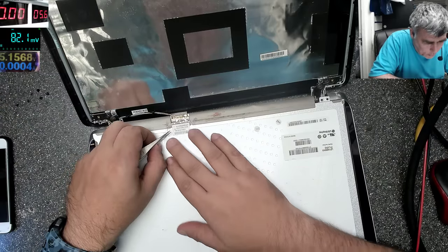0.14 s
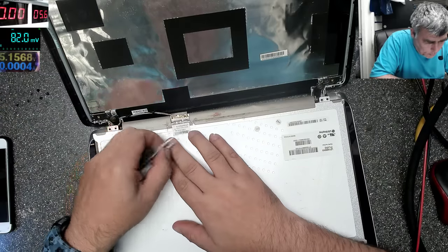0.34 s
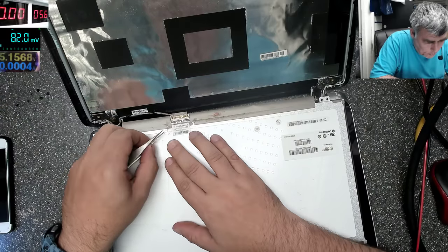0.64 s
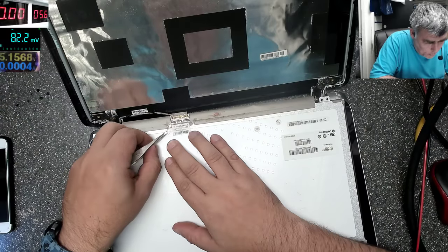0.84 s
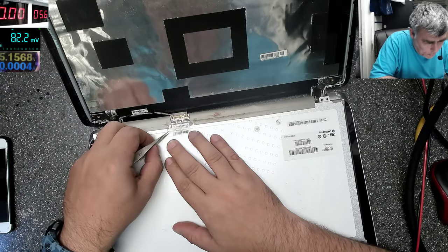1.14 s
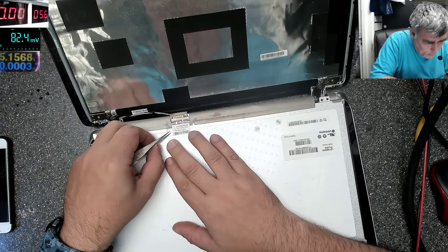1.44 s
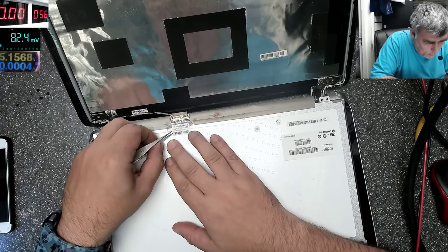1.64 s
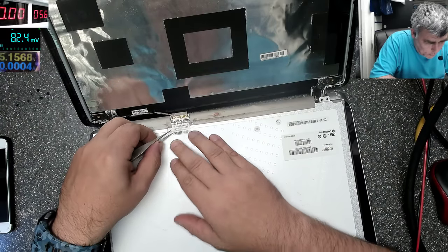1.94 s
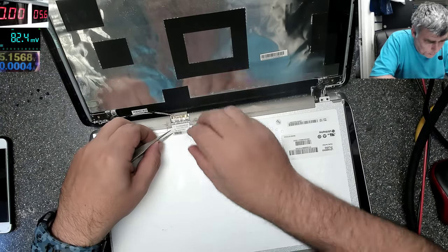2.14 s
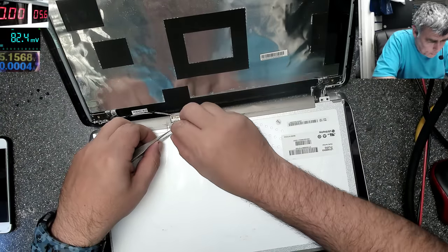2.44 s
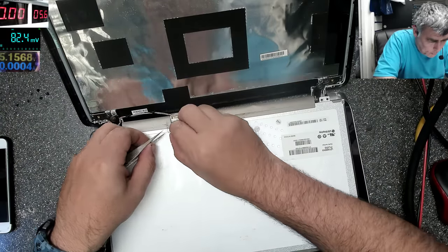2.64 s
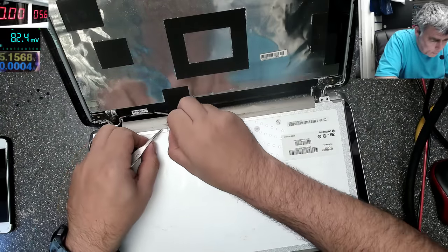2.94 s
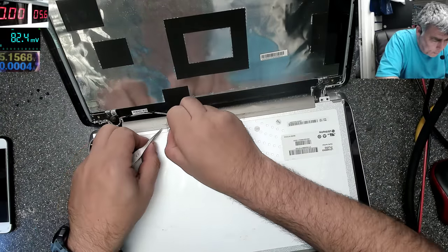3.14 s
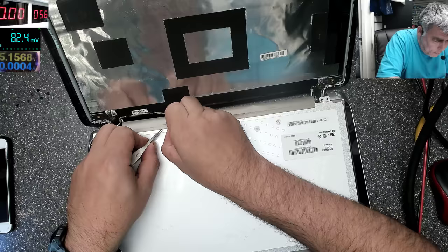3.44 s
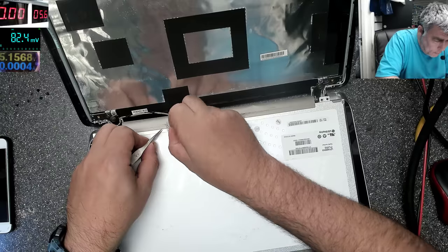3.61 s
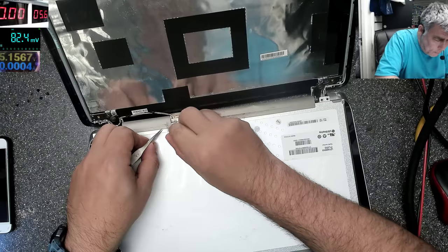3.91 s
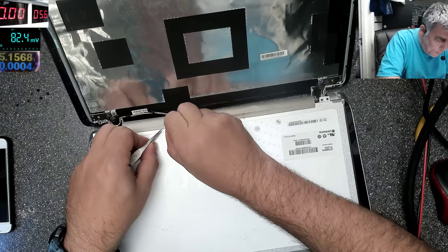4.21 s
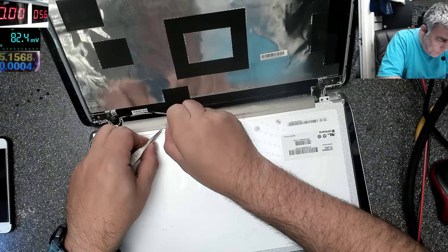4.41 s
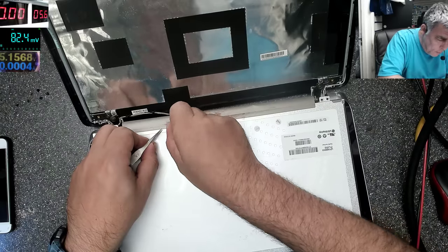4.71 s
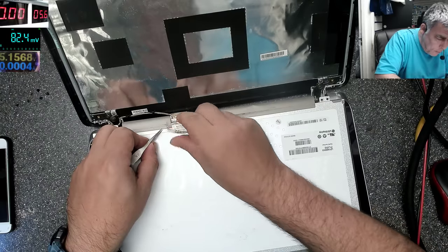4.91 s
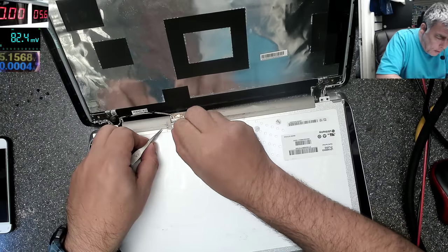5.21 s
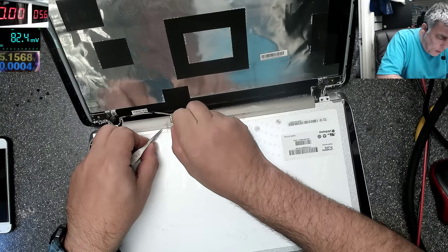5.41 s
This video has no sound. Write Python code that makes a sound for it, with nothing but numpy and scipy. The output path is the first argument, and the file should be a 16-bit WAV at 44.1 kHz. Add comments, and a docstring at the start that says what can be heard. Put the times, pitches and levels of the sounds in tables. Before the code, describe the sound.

Metal tweezers snap hard against a connector on a laptop panel, followed by quiet hiss, a tiny scrape, a bright clink and a final click.

```python
"""Metal tweezers work a display cable into its connector on a laptop panel, in a small dry workshop.
A palm presses and fingers slide as three sharp snaps strike; a faint squeak then climbs and throbs.
Near 2.5 s the shell clinks, the tip scrapes and snaps off; tweezers clink and weak snaps follow past 3.1 s.
Two shell clinks and a press end it near 5.5 s; hiss and room rumble run throughout.
Contacts are filtered clicks with ringing modes, rubbing is shaped noise, the squeak a gliding sine."""
import sys
import numpy as np
from scipy import signal
from scipy.fft import rfft, irfft
from scipy.io import wavfile
from scipy.ndimage import uniform_filter1d

SR = 44100
rng = np.random.default_rng(int(sys.argv[2]) if len(sys.argv) > 2 else 0)


def dump_mix(stems):
    """Bounce the given channels to the path in sys.argv[1] as a 16-bit WAV at rate SR."""
    frames = np.atleast_2d(stems).T  # one column per channel
    limited = np.clip(frames, -1, 1)  # hard clip at full scale
    pcm = np.round(limited * 32767).astype(np.int16)
    wavfile.write(sys.argv[1], SR, pcm)


N = 245449
TIME_S = np.arange(N) / SR
RING_SAMPLES = 16384
RING_S = TIME_S[:RING_SAMPLES]

# Tip snapping on the connector. Each row: start in seconds, level in dB, panel knock trim in dB,
# brightness in dB per octave, grit in dB, screen echo delay in ms, echo share as a gain, room trim in dB.
SNAPS = [(0.1927, 21.5, 0.5, -2, -44.5, .5, 0.49, -1.5), (0.2684, 17.5, -15, 3.5, -47, 0.51, 0.27, -4),
         (0.2857, 11, 5, 1.5, -34, 0.73, 0.52, 0), (2.5771, -16.5, 6, -7, -13, 0.69, 0.31, 1),
         (3.3075, -33.5, 13, -11, -14, 3, 0.72, 14.5), (3.36, -37.5, 11, -13, -12, 3.4, .7, 11)]
# Skidding touches of tweezers and of connector shell. Each row: start in seconds, level in dB,
# panel knock trim in dB, skid t60 in seconds, skid in dB, room trim in dB.
TWEEZER_CLINKS = [(3.1811, 0.5, 0.5, 0.021, 8.5, 6.5), (3.4540, -40, 17, .03, 4, -3)]
SHELL_CLINKS = [(2.5101, -43, -5.5, 0.028, 10, 3.5), (5.4920, -9, -4, 0.049, 10.9, 5),
                (5.5525, -33, 6, .015, 6, -2)]
# Free modes of tweezers, shell and panel. Each row: frequency in Hz, relative level in dB, t60 in seconds.
TWEEZER_MODES = [(3060, -7.5, 0.024), (3470, -4.5, 0.056), (4410, -1, 0.031), (5980, 5, 0.054),
                 (6840, 7, 0.05), (6820, 6, 0.045), (7560, -4, 0.046), (7570, 4, 0.09), (8200, -8, .05),
                 (8430, 3, 0.041), (8400, -9, 0.044), (9250, -5, 0.04)]
SHELL_MODES = [(3150, -2.5, 0.049), (3810, -6, 0.07), (3940, -14.5, 0.043), (5074, 6, 0.033),
               (5230, -3, 0.037), (5860, -9.5, 0.029), (6230, 1, 0.033), (6180, 0, 0.032), (6700, -5, .035),
               (7240, 1, 0.068), (8500, -13, 0.038)]
PANEL_MODES = [(461, -13, .08), (525, -10, 0.062), (960, 2.5, 0.0391), (1095, 0, 0.018), (1920, 1.5, 0.022),
               (2300, -6.5, .015), (2898, -1, .02)]
# Colour of each kind of contact. Each row: frequency in Hz, level in dB.
SNAP_COLOUR = [(150, -49.5), (700, -45), (950, -29), (1500, -38), (2700, -29.5), (3300, -17.5), (3900, -4),
               (4400, -4), (5900, -1.5), (7900, -3.5), (9000, -17.5), (10800, -21), (12500, -33.5),
               (16000, -31.5)]
TWEEZER_COLOUR = [(200, -40), (380, -34), (500, -8), (780, -35), (1020, -24), (1500, -39.5), (2500, -40),
                  (3200, -10.5), (4700, -6.5), (5300, -7), (6200, -0.5), (8300, 0), (9800, -14),
                  (12000, -30)]
SHELL_COLOUR = [(200, -29), (520, -14), (700, -27.5), (2500, -27), (3000, -6), (3800, -8), (4600, -11.5),
                (5200, 4.5), (7000, 1.5), (8100, -8.5), (8900, -25), (11000, -20), (16000, -29)]
# Palm bearing on the panel. Each row: start in seconds, length in seconds, rumble in dB.
PRESSES = [(-.04, 0.15, -48), (.12, 0.27, -46.5), (.415, .25, -46.5), (3.15, 0.2, -62), (5.485, .13, -53)]
# Fingers sliding over the panel. Each row: start in seconds, length in seconds, rubbing in dB.
SLIDES = [(-.04, 0.48, -73), (.47, 0.16, -76), (2.52, 0.472, -72), (3.25, 0.32, -72.5)]
# Colour of the room's return. Each row: frequency in Hz, gain over the direct sound in dB before trims.
ROOM_COLOUR = [(300, 1.5), (1500, 5), (3000, 5.5), (4000, -1), (6000, -1), (8000, -0.5), (9300, 4.5),
               (11500, 6), (13500, -2.5)]
# Lead of the left microphone port over the right. Each row: frequency in Hz, phase in radians.
PORT_PHASE = [(100, .05), (1000, .4), (2500, 0.56), (5000, 1.21), (7300, 1.77), (9000, 1.1),
              (11000, 0.5017), (14000, .2)]
# Hiss and rumble, common to and differing between the channels.
# Each row: frequency in Hz, relative density in dB per Hz.
FLOOR_MID = [(12, -24), (20, 3), (59, -10), (123, -13), (247, -19), (276, -20.5), (308, -20), (345, -22),
             (496, -23.5), (586, -25.5), (1020, -29.5), (5030, -29), (14500, -22), (15800, -24.5)]
FLOOR_SIDE = [(20, -0.5), (38, -5), (119, -8.5), (397, -20), (1210, -25), (7200, -23), (9000, -49),
              (15800, -37.5)]

FLOOR_MID_DB, FLOOR_SIDE_DB = -61, -69
SCRAPE_DROP_S, SCRAPE_DB = 2.583, -56.5
SCRAPE_RISE_DB_PER_S, SCRAPE_FALL_DB_PER_S = 350, 900
HAND_ATTACK_S, HAND_RELEASE_S = 0.031, 0.07
SQUEAK_START_S, SQUEAK_LENGTH_S, SQUEAK_DB = .315, .37, -65
GLIDE_START_HZ, GLIDE_HZ_PER_S, SQUEAK_FADE_DB_PER_S = 379, 130, 17
CATCH_PEAK_S, CATCH_PER_S, CATCH_DB = .365, 7.1, 5
TOP_HZ = 15900


def snaps(panel_db=-57, grit_t60_s=0.02499):
    """The tip slips off and strikes, crunching a little; the panel knocks along."""
    out = np.zeros((2, N))
    for start_s, db, knock_db, tilt_db, grit_db, echo_ms, share, room_db in SNAPS:
        click = crack(SNAP_COLOUR, tilt_db)
        grit = undb(grit_db) * scatter(grit_t60_s)
        knock = undb(panel_db + knock_db) * ring(PANEL_MODES)
        add(out, start_s, undb(db) * bench(click + grit + knock, room_db, echo_ms, share))
    return out


def clink(touches, modes, colour, ring_db, panel_db, panel_hz):
    """Metal touches, rings and briefly skids; the soft push moves mainly the panel's low modes."""
    out = np.zeros((2, N))
    contact = crack(colour)
    lowpass = signal.butter(4, panel_hz, fs=SR, output="sos")
    knock = signal.sosfilt(lowpass, ring(PANEL_MODES))
    for start_s, db, knock_db, skid_t60_s, skid_db, room_db in touches:
        skid = irfft(rfft(contact) * rfft(scatter(skid_t60_s)))
        touch = contact + undb(skid_db) * skid
        touch = touch + undb(ring_db) * ring(modes)
        touch = touch + undb(panel_db + knock_db) * knock
        add(out, start_s, undb(db) * bench(touch, room_db))
    return out


def scrape():
    """A thin fizz: the tip scrapes harder and harder until it drops off an edge."""
    since_s = TIME_S - SCRAPE_DROP_S
    rise_db = SCRAPE_RISE_DB_PER_S * since_s
    fall_db = -SCRAPE_FALL_DB_PER_S * since_s
    fizz = noise([(3000, -12), (7500, -13), (9500, 0), (10800, -8), (13000, -21)])
    return undb(SCRAPE_DB + np.minimum(rise_db, fall_db)) * fizz


def hand():
    """The palm presses and the fingers slide: the bench rumbles and skin rubs."""
    rumble = noise([(4, -21.5), (12, 0.0), (25, -6.0), (60, -23), (150, -45.0), (400, -56.5), (2000, -80.0)])
    rub = noise([(100, -11.0), (400, 1.5), (650, -4.5), (1000, -13.5), (5000, -19), (15000, -27.5)])
    return strokes(PRESSES) * rumble + strokes(SLIDES) * rub


def squeak(rough=.05):
    """Skin sticks and slips on the panel: an unsteady tone that climbs, fades and throbs."""
    since_s = np.clip(TIME_S - SQUEAK_START_S, 0, SQUEAK_LENGTH_S)
    glide_hz = GLIDE_START_HZ + GLIDE_HZ_PER_S * since_s
    # rough is the rms pitch deviation as a fraction
    slip_hz = glide_hz * (1 + rough * noise([(40, -6.5), (100, -9), (400, -61)]))
    throb_db = CATCH_DB * np.cos(2 * np.pi * CATCH_PER_S * (TIME_S - CATCH_PEAK_S))
    fade_db = -SQUEAK_FADE_DB_PER_S * since_s
    gain = strokes([(SQUEAK_START_S, SQUEAK_LENGTH_S, SQUEAK_DB)]) * undb(throb_db + fade_db)
    return gain * np.sqrt(2) * np.sin(2 * np.pi * np.cumsum(slip_hz) / SR)


def floor():
    """Even microphone hiss over a little room rumble."""
    mid = undb(FLOOR_MID_DB) * noise(FLOOR_MID)
    side = undb(FLOOR_SIDE_DB) * noise(FLOOR_SIDE)
    return np.array([mid + side, mid - side])


def crack(colour, tilt_db=0):
    """The causal, minimum-phase click of metal on metal; tilt_db per octave brightens it."""
    bins_hz = np.fft.rfftfreq(RING_SAMPLES, 1 / SR)
    octaves = np.log2(np.clip(bins_hz, 3000, 12000) / 6000)
    level_db = outline(colour, RING_SAMPLES) + tilt_db * octaves
    # folding the cepstrum gives minimum phase
    cepstrum = irfft(np.log(undb(level_db)))
    cepstrum[1:RING_SAMPLES // 2] *= 2
    cepstrum[RING_SAMPLES // 2:] = 0
    return irfft(np.exp(rfft(cepstrum)))


def ring(modes):
    """Decaying modes of a struck part; neighbours swing in opposite senses."""
    out = np.zeros(RING_SAMPLES)
    for k, (hz, db, t60_s) in enumerate(modes):
        out += (-1) ** k * undb(db) * fade(t60_s) * np.sin(2 * np.pi * hz * RING_S)
    return out


def scatter(t60_s, gap_s=0):
    """A dying burst of noise of about unit energy, spread evenly over all pitches."""
    after_gap = RING_S >= gap_s
    spectrum = rfft(rng.standard_normal(RING_SAMPLES) * fade(t60_s) * after_gap)
    spectrum /= np.sqrt(uniform_filter1d(np.abs(spectrum) ** 2, size=150))
    return irfft(spectrum) * after_gap


def bench(x, room_db, echo_ms=0, share=0, near_db=-9.0, near_t60_s=0.042, far_db=-14.0, far_t60_s=0.19,
          gap_s=0.0011, apart_per_rad=0.29):
    """A sound, its echo off the screen and the scatter of bench and room, as the two ports hear them."""
    echoes = []
    for _ in range(2):
        near = undb(near_db) * scatter(near_t60_s, gap_s)
        far = undb(far_db) * scatter(far_t60_s, gap_s)
        echoes.append(near + far)
    room_gain = undb(room_db + outline(ROOM_COLOUR, RING_SAMPLES))
    common, differing = rfft(np.array(echoes)) * rfft(x) * room_gain
    common = common + rfft(x + share * delay(x, echo_ms))
    # the ports hear the room less alike where their phases part most
    phase_rad = outline(PORT_PHASE, RING_SAMPLES)
    differing = differing * apart_per_rad * phase_rad
    left = common + differing
    right = (common - differing) * np.exp(-1j * phase_rad)
    closing = np.interp(RING_S, [.25, .33], [1, 0])
    return closing * irfft(np.array([left, right]))


def strokes(moves):
    """Gain over time of hand moves: each swells, holds and lets go."""
    gain = np.zeros(N)
    for start_s, length_s, db in moves:
        attack = (TIME_S - start_s) / HAND_ATTACK_S
        release = (start_s + length_s - TIME_S) / HAND_RELEASE_S
        gain += undb(db) * np.clip(np.minimum(attack, release), 0, 1)
    return gain


def noise(points):
    """Noise of unit rms with the given (Hz, dB) colour."""
    x = irfft(rfft(rng.standard_normal(N)) * undb(outline(points, N)), N)
    return x / x.std()


def outline(points, size):
    """Values given at points in Hz, interpolated over log frequency on the bins of a real FFT."""
    hz, values = np.transpose(points)
    return np.interp(np.log(np.fft.rfftfreq(size, 1 / SR) + 1), np.log(hz), values)


def fade(t60_s):
    """Exponential decay, 60 dB down after t60_s."""
    return np.exp(-np.log(1000) * RING_S / t60_s)


def delay(x, ms):
    """Circular delay by any fraction of a sample, as a linear phase."""
    bins_hz = np.fft.rfftfreq(len(x), 1 / SR)
    return irfft(rfft(x) * np.exp(-2j * np.pi * bins_hz * ms / 1000), len(x))


def undb(db):
    """Decibels to gain."""
    return 10 ** (np.asarray(db) / 20)


def add(out, start_s, sound):
    """Lay a stereo sound into the scene at start_s."""
    start = int(start_s * SR)
    out[:, start:start + sound.shape[1]] += sound[:, :N - start]


def scene():
    """All contacts, the hand and the background."""
    tweezers = clink(TWEEZER_CLINKS, TWEEZER_MODES, TWEEZER_COLOUR, ring_db=-34.5, panel_db=-40.0, panel_hz=530)
    shell = clink(SHELL_CLINKS, SHELL_MODES, SHELL_COLOUR, ring_db=-25.5, panel_db=-31.0, panel_hz=490)
    return snaps() + tweezers + shell + scrape() + hand() + squeak() + floor()


def record(dry):
    """Peaks clip at full scale; a steep low-pass cuts the top."""
    lowpass = signal.ellip(10, .2, 60, TOP_HZ, fs=SR, output="sos")
    return signal.sosfilt(lowpass, np.clip(dry, -1, 1))


dry = scene()
out = record(dry)
dump_mix(out)
```